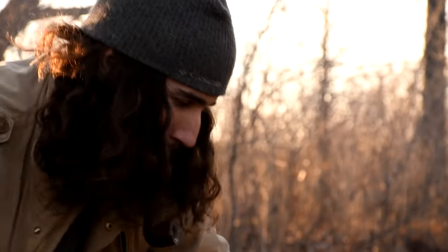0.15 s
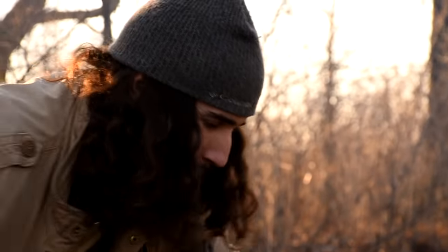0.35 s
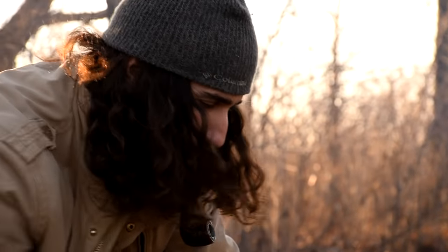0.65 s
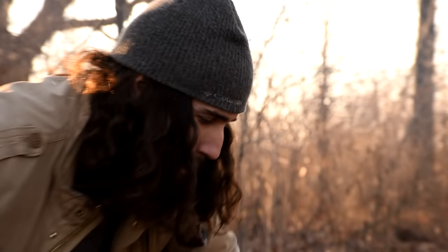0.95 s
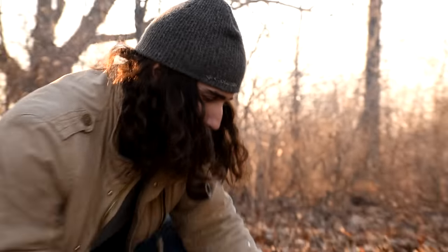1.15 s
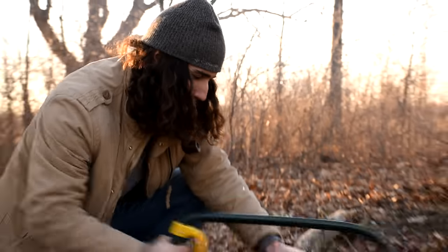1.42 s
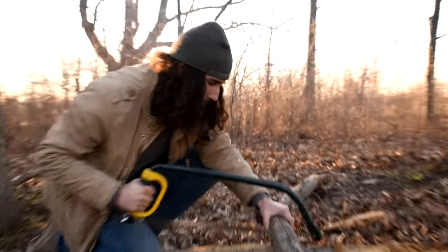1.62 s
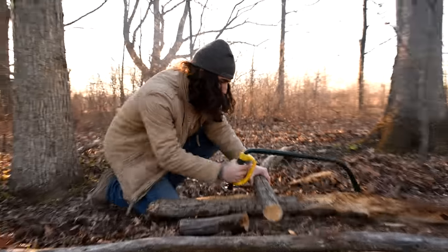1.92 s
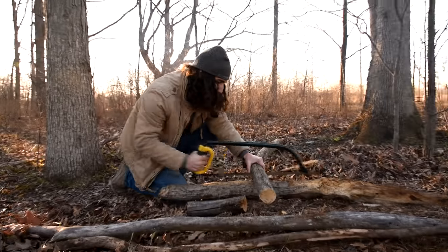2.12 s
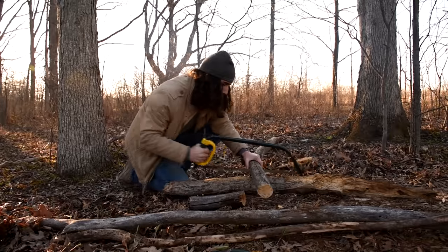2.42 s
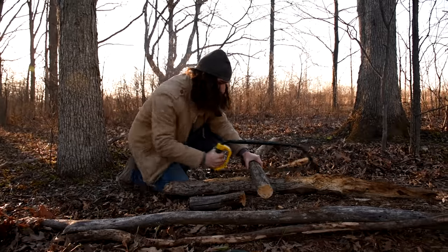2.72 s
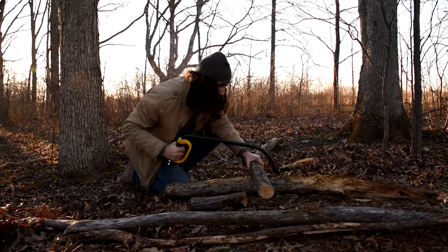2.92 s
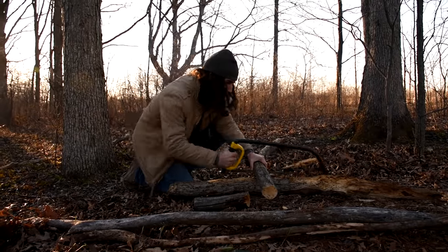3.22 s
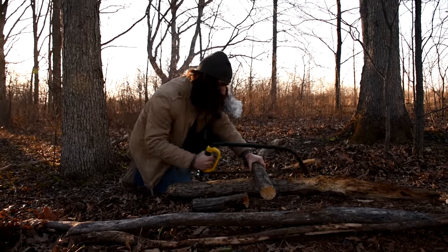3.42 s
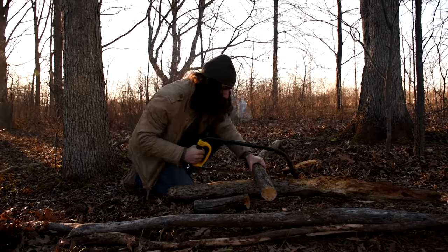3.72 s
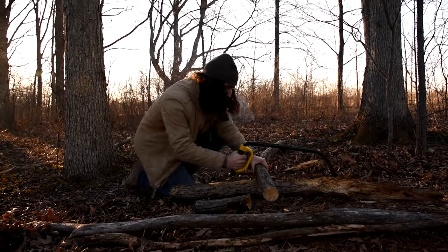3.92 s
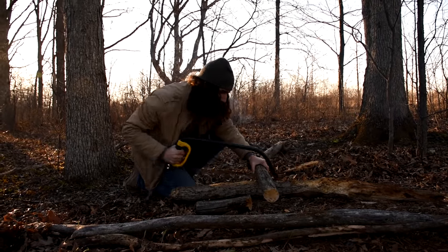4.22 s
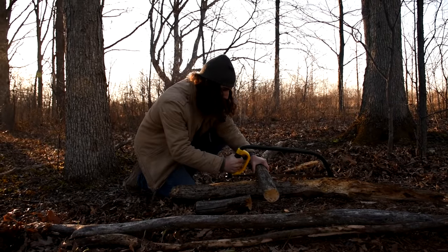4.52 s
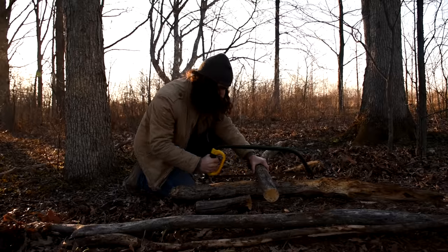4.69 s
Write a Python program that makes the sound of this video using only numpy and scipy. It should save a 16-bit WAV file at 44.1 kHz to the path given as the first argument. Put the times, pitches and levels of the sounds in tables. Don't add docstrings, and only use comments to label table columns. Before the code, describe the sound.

Rapid steady sawing through wood, heard near the microphone from the start to the end. Coarse tearing strokes alternate with very brief gaps, growing somewhat stronger and duller later. The blade and steel frame ring thinly, the log thrums and knocks, and a burst of splinters snaps around four seconds. Gentle wind buffets the microphone in an open forest; faint bird whistles appear early.

```python
import sys
import numpy as np
from scipy import signal
from scipy.fft import rfft, irfft, next_fast_len
from scipy.io import wavfile
from scipy.ndimage import uniform_filter1d, map_coordinates

SR = 44100
rng = np.random.default_rng(int(sys.argv[2]) if len(sys.argv) > 2 else 0)


def generate_wav(sig):
    pcm = np.round(np.clip(np.atleast_2d(sig).T, -1, 1) * 32767).astype(np.int16)
    wavfile.write(sys.argv[1], SR, pcm)


def invert_db(level):
    return 10 ** (np.asarray(level, dtype=float) / 20)


N = 214095


def unit(x):
    return x / np.sqrt(np.mean(x ** 2) + 1e-20)


def along(points, hz):
    f, v = np.transpose(points)
    return np.interp(np.log(hz + 1), np.log(f + 1), v)


def wobble(rate):
    coarse = np.arange(0, N + 64, 64)
    points = rng.standard_normal(int(N * rate / SR) + 4)
    smooth = map_coordinates(points, [coarse * rate / SR])
    return np.interp(np.arange(N), coarse, smooth)


def coloured(x, spectrum):
    m = next_fast_len(N + 8192)
    gain = invert_db(along(spectrum, np.fft.rfftfreq(m, 1 / SR)))
    return irfft(rfft(x, m) * gain, m)[:N]


def mode(x, hz, width_hz):
    return signal.lfilter(*signal.iirpeak(hz, hz / abs(width_hz), SR), x)


def ring(x, hz, width_hz):
    turn = np.exp(2j * np.pi * np.cumsum(hz * np.ones(N)) / SR)
    keep = np.exp(-np.pi * abs(width_hz) / SR)
    return 2 * np.real(turn * signal.lfilter([1 - keep], [1, -keep], x / turn))


def decays(rows):
    out, t = np.zeros(N + SR), np.arange(SR // 4) / SR
    for s, db, t60, rise in rows:
        fall = invert_db(db - 60 * t / max(t60, .01))
        out[round(s * SR):][:len(t)] += fall * (1 - np.exp(-t / max(rise, .0003)))
    return out[:N]


def air():
    # (time [s], level [dB])
    wind = [(0.0, -30.5), (0.81, -33.5), (1.69, -31.5), (1.71, -25.5), (1.81, -32), (2.11, -27),
            (2.21, -36), (2.39, -27), (2.44, -35), (2.85, -27), (3.01, -34), (3.09, -25), (3.5, -29.5),
            (3.55, -32.5), (3.85, -29), (3.9, -34.5), (4.81, -30), (4.85, -36)]
    # (frequency [Hz], level [dB])
    rumble_tone = [(12, -13), (24, -6.5), (36, 4.5), (50, -7), (90, -5.5), (140, -16.5), (200, -23),
                   (280, -53)]
    # (frequency [Hz], level [dB])
    forest_tone = [(120, -29), (200, 4), (914, -17), (2550, -7.5), (2790, -16), (5500, -32), (9180, -27),
                   (11000, -33), (15900, -36)]
    lumps = invert_db(1.6 * wobble(12) + 0.52 * wobble(5.1))
    rumble = unit(lumps * coloured(rng.standard_normal(N), rumble_tone))
    rustle = invert_db(3.3 * wobble(2.4))
    hiss = unit(rustle * coloured(rng.standard_normal(N), forest_tone))
    times, levels_db = np.transpose(wind)
    wind_db = np.interp(np.arange(N) / SR, times, levels_db)
    return invert_db(wind_db) * rumble + invert_db(-47) * hiss


def drive(over_db, power, rest_db, bright_share):
    # (start [s], length [s], level [dB],
    # share of the stroke spent speeding up [0-1], brightness [dB])
    strokes = [(0.024, 0.29, -22.5, 0.58, 4.5), (0.331, 0.28, -17.5, 0.69, 1), (0.638, 0.34, -23, 0.49, 3),
               (1.048, 0.29, -20, 0.52, 2), (1.356, 0.3, -19, 0.47, 2), (1.645, 0.290, -16.5, 0.73, -0.5),
               (2.019, 0.3, -19.5, 0.6, 1.5), (2.337, 0.32, -17.5, 0.62, -2.5),
               (2.688, 0.32, -20.5, 0.44, -0.5), (3.036, 0.29, -17, 0.62, -3),
               (3.361, 0.29, -19, 0.57, -0.5), (3.669, 0.3, -16, 0.67, -3.5), (4.024, 0.3, -16.5, 0.22, 1),
               (4.334, 0.268, -15, 0.67, 0.1), (4.633, 0.32, -15.5, 0.46, -0.7)]
    cruise = 1.076
    out = np.full(N + SR, invert_db(rest_db))
    for s, length, db, lean, bright_db in strokes:
        u = np.linspace(0, 1, round(length * SR))
        rise_and_fall = np.minimum(u / lean, (1 - u) / (1 - lean))
        speed = np.sin(np.pi / 2 * np.minimum(1, cruise * rise_and_fall))
        level = invert_db(db + over_db + bright_share * bright_db)
        out[round(s * SR):][:len(u)] += level * np.abs(speed) ** power
    return out[:N]


def jerks():
    # (time [s], peak level [dB], log knock against that peak [dB])
    caught = [(0.045, -16, -32), (0.0847, -6, -4), (0.1544, -10, -9), (0.708, -1.5, -9.5),
              (0.7544, -10, -17), (0.7844, -13, -1.5), (0.8194, -16, -15), (0.8974, -12, -17),
              (0.9744, -21, -18), (1.062, -27, -1), (1.2434, -4, -5.5), (1.3941, -18, -8),
              (1.6929, -15.5, -4), (1.8997, -3.5, -23), (2.0733, -5, -4.5), (2.3585, -30, -12),
              (2.749, -4, -0.5), (2.802, -3, -17), (2.859, -6, -31), (3.0479, -18, -4), (3.146, -5, -28),
              (3.1985, -6, -7), (3.3687, -14, -23), (3.412, -8, -11), (4.023, -18.5, -14),
              (4.0454, -8.5, -4), (4.1578, 1, -25), (4.359, -12.5, -31), (4.6378, -22, -24),
              (4.768, -0.5, -15)]
    # (time [s], peak level [dB], log knock against that peak [dB])
    turned = [(0.345, -26, -17), (0.6623, -27, -25), (0.9974, -25, -17), (1.3514, -22, -10),
              (2.0516, -16, -24), (2.7264, -12, -28), (3.11, -18, -27), (3.444, -4.5, -25),
              (3.693, -18, -22), (3.7403, -13, -25), (4.2183, -23, -2), (4.6797, -12, -13)]
    t60_s, rise_s = 0.065, 0.0024
    events = caught + turned
    catches = decays([(s, db - 18.0, t60_s, rise_s) for s, db, _ in events])
    knocks = decays([(s, db + knock_db - 7.5, t60_s, rise_s) for s, db, knock_db in events])
    return catches, knocks


def fibres(spread_db, clump_db, clump_rate):
    burst_db = spread_db * np.minimum(rng.exponential(size=N), 4.5)
    size = invert_db(burst_db + clump_db * wobble(clump_rate))
    return unit(size * rng.standard_normal(N))


def patchy(x, depth_db):
    z = signal.stft(x, nperseg=256)[2]
    spots = rng.standard_normal(z.shape)
    field = uniform_filter1d(uniform_filter1d(spots, size=3, axis=0), size=5, axis=1)
    return signal.istft(z * invert_db(depth_db * unit(field)), nperseg=256)[1][:N]


def tearing(force, chatter, catches):
    # (frequency [Hz], level [dB])
    tear_tone = [(410, -11), (700, -22), (1490, 0), (1640, -6), (1870, 1.5), (3680, -7.5), (9070, -18),
                 (10700, -14), (15900, -24)]
    grains = patchy(fibres(spread_db=1.5, clump_db=2.0, clump_rate=250), depth_db=3.0)
    raw = unit(coloured(grains, tear_tone))
    dull = signal.sosfilt(signal.butter(2, 6000, fs=SR, output="sos"), raw)
    fine = drive(over_db=-12, power=2.6, rest_db=-67, bright_share=0.62) * chatter
    return invert_db(-4) * force * dull + (invert_db(11.0) * fine + invert_db(9.5) * catches) * (raw - dull)


def blade(push):
    # (frequency [Hz], width [Hz], level [dB])
    blade_modes = [(1187, 69, -4), (1516, 77, 0), (1865, 180, -3.5), (2220, 310, -5), (2482, 51, -4),
                   (2700, 230, -3), (2903, 88, -4.5), (3428, 104, -2.5), (3688, 81, -2.5), (4003, 74, -7.5),
                   (5100, 150, -17), (5590, 78, -14), (6055, 43, -8), (6380, 64, -8), (6760, 24, -9.5),
                   (7320, 74, -10.5), (8720, 51, -36)]
    out = 0
    for hz, width_hz, db in blade_modes:
        swell = invert_db(db + 2.73 * wobble(20) + 1.3 * wobble(7))
        out = out + swell * mode(push, hz, width_hz) * np.sqrt(100 / width_hz)
    return invert_db(11.0) * out


def log(chatter, knocks):
    # (frequency [Hz], width [Hz], level [dB])
    log_modes = [(268, 116, -3.5), (471, 184, -3.5), (613, 77, -2), (813, 118, -8)]
    thrum = drive(over_db=-10.5, power=1.06, rest_db=-56, bright_share=0.22) * chatter
    push = (thrum + knocks) * fibres(spread_db=2.5, clump_db=3, clump_rate=56)
    out = 0
    for k, (hz, width_hz, db) in enumerate(log_modes):
        swell = invert_db(db + 0.95 * wobble(7.6))
        out = out + (-1) ** k * swell * mode(push, hz, width_hz)
    return invert_db(19.5) * out


def frame(teeth, force):
    # (frequency [Hz], level [dB], time to fall 60 dB [s])
    frame_modes = [(10680, -5, .3), (10720, -6, .035), (9680, -13, .25), (9760, -11, .03), (9400, -19, .03),
                   (3420, -9, .12)]
    stretch = 1 + .06 * uniform_filter1d(force, size=3000)
    shake = drive(over_db=-13, power=1.96, rest_db=-57.5, bright_share=1.7)
    shake = shake * invert_db(0.79 * wobble(15)) * teeth
    out = 0
    for hz, db, t60 in frame_modes:
        out = out + invert_db(db + 2.7 * wobble(5.48)) * ring(shake, hz * stretch, 2.7 / t60)
    return invert_db(26.0) * out


def groans():
    # (middle [s], frequency [Hz], level [dB], length [s])
    groan_events = [(0.108, 301, -5, 0.017), (0.462, 349, -6, .05), (0.726, 291, -1, 0.019),
                    (1.246, 379.3, -2.5, 0.038), (1.522, 318.6, -1.5, 0.047), (2.148, 265, -1.5, 0.034),
                    (2.23, 285, -3, 0.028), (2.513, 361, 4, 0.034), (2.818, 268, -2, 0.032),
                    (3.216, 341, 1, .04), (3.85, 301.3, -4, 0.043), (4.168, 288, 4.5, 0.074),
                    (4.517, 373, 6, 0.021), (4.808, 280, 5.5, 0.034), (4.783, 430, 4.5, .02),
                    (2.085, 410, 0.5, 0.015)]
    t = np.arange(N) / SR
    waver = np.cumsum(1 + .03 * wobble(40)) / SR
    out = 0
    for s, hz, db, length in groan_events:
        swell = np.exp(-((t - s) / length) ** 2)
        out = out + invert_db(db - 27.5) * swell * np.sin(2 * np.pi * hz * waver)
    return invert_db(2.7 * wobble(45)) * out


def saw():
    chatter = invert_db(0.85 * wobble(40))
    catches, knocks = jerks()
    cut = drive(over_db=-0.64, power=1.5, rest_db=-48, bright_share=0.01)
    force = cut * chatter + catches
    teeth = fibres(spread_db=2.5, clump_db=0.5, clump_rate=280)
    wood = tearing(force, chatter, catches) + log(chatter, knocks) + groans()
    return wood + blade(teeth * force) + frame(teeth, force)


def jolt_rings():
    # (time [s], frequency [Hz], peak level [dB], time to fall 60 dB [s])
    jolts = [(.555, 6390, -14, 0.06), (.58, 10000, -36, 0.41), (1.9, 6060, -32, 0.23),
             (1.11, 3430, -25, 0.57), (1.91, 3300, -33, 0.19), (0.2, 9750, -40, 0.34),
             (2.26, 8900, -44, .3), (4.21, 6085, -36, 0.55), (4.25, 9700, -39, 0.48)]
    clock = np.arange(N) / SR
    out = 0
    for s, hz, db, t60 in jolts:
        out = out + decays([(s, db, t60, .002)]) * np.sin(2 * np.pi * hz * clock)
    return out


def ticks():
    # (time [s], peak level [dB], centre frequency [Hz], width [Hz])
    tick_events = [(0.997, -24, 2590, 1200), (2.3374, -43, 2560, 1200), (2.6418, -16, 2260, 960),
                   (3.1475, -11, 2480, 1200), (4.3644, -14, 3500, 2500), (2.359, -28, 7100, 3000),
                   (4.638, -24, 6000, 2500), (4.3595, -19, 6000, 3000)]
    out, t = np.zeros(N + SR), np.arange(SR // 50) / SR
    for s, db, hz, width_hz in tick_events:
        knock = np.sin(2 * np.pi * hz * t) * np.exp(-np.pi * abs(width_hz) * t / 4)
        burst = rng.standard_normal(len(t)) * invert_db(-8.0 - 60 * t / 0.013)
        crack = mode(burst, hz, 2 * width_hz)
        out[round(s * SR):][:len(t)] += invert_db(db + 1) * (knock + crack)
    return out[:N]


def bird():
    # (start [s], length [s], first frequency [Hz], last frequency [Hz], level [dB])
    peeps = [
        (0.955, 0.032, 3150, 3180, -48),
        (0.981, 0.064, 2550, 2570, -42),
        (1.334, 0.032, 2420, 2680, -45),
        (1.975, 0.057, 2440, 2230, -51),
    ]
    t, out = np.arange(N) / SR, 0
    for s, length, first_hz, last_hz, db in peeps:
        hz = np.interp(t, [s, s + length], [first_hz, last_hz])
        on = np.clip(np.minimum(t - s, s + length - t) / 0.011, 0, 1)
        out = out + on * invert_db(db + 6.5) * np.sin(2 * np.pi * np.cumsum(hz) / SR)
    return out


def splinters():
    # (time [s], peak level [dB])
    snaps = [(4.0557, -20), (4.0694, -9), (4.0784, -7), (4.0878, 5), (4.096, 2), (4.1111, 1), (4.1175, 1),
             (4.1394, -3), (4.179, -10)]
    out, t = np.zeros(N + SR), np.arange(SR // 50) / SR
    for s, db in snaps:
        tone = np.sin(2 * np.pi * rng.uniform(7400, 11000) * t)
        spit = 0.29 * np.diff(rng.standard_normal(len(t) + 1))
        out[round(s * SR):][:len(t)] += invert_db(db - 60 * t / 0.0021) * (tone + spit)
    return out[:N]


def trees(x):
    # (frequency [Hz], time to fall 60 dB [s])
    fading = [(300, 0.68), (2000, 0.2), (5000, 0.083), (12000, 0.12)]
    hz, t, z = signal.stft(rng.standard_normal(SR // 2), SR, nperseg=256)
    fall = invert_db(-60 * t / along(fading, hz)[:, None])
    tail = signal.istft(z * fall, SR, nperseg=256)[1]
    delayed = np.pad(x, (400, 0))
    return signal.fftconvolve(delayed, tail / np.linalg.norm(tail))[:N]


def scene():
    near = saw() + jolt_rings() + ticks() + bird() + splinters()
    return (near + invert_db(-23.5) * trees(near) + air())[None]


def roll_off(x):
    return signal.sosfilt(signal.butter(12, 16240, fs=SR, output="sos"), x)


def record(dry):
    top_hz, edge_hz = 15720, 240
    flat = dry / (1 + np.abs(dry) ** 8) ** (1 / 8)
    over = np.clip((np.fft.rfftfreq(N, 1 / SR) - top_hz) / edge_hz, 0, 3)
    mix = irfft(rfft(flat) * invert_db(-40 * over), N)
    return roll_off(mix)


dry = scene()
out = record(dry)
generate_wav(out)
```